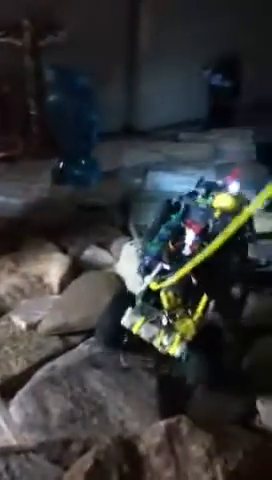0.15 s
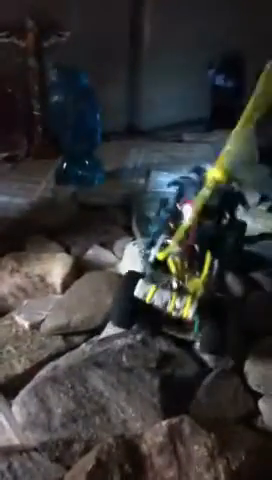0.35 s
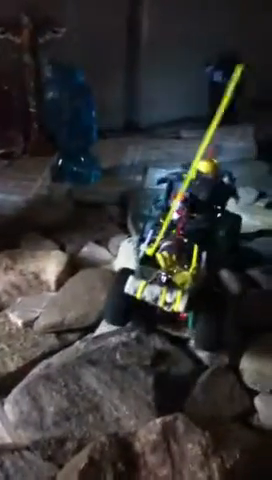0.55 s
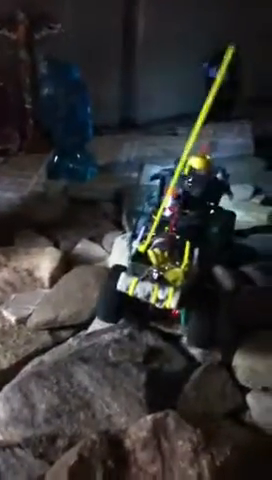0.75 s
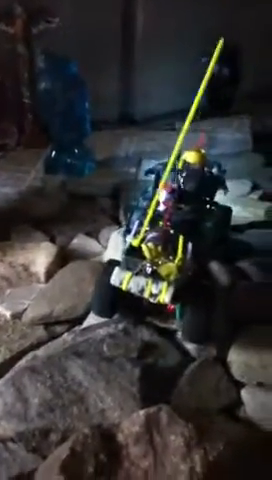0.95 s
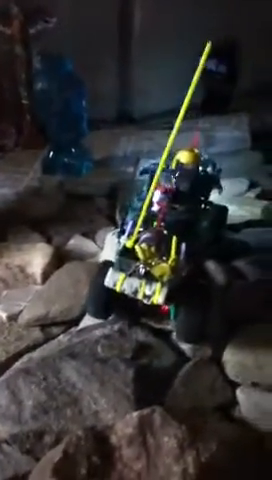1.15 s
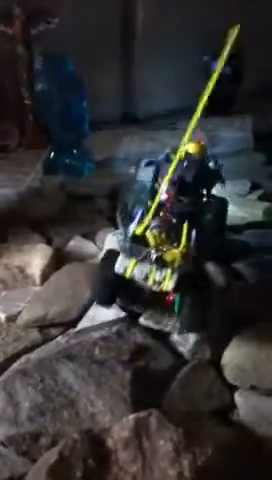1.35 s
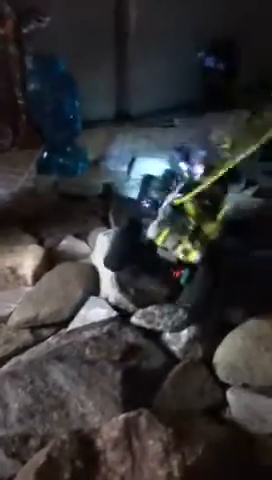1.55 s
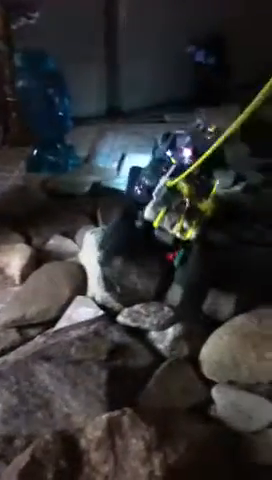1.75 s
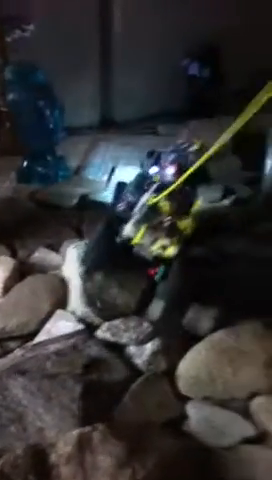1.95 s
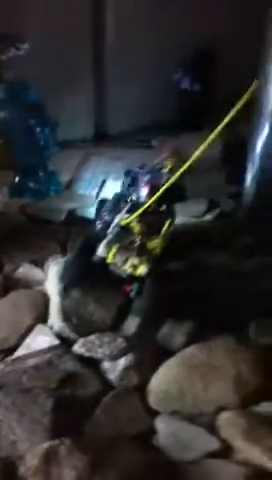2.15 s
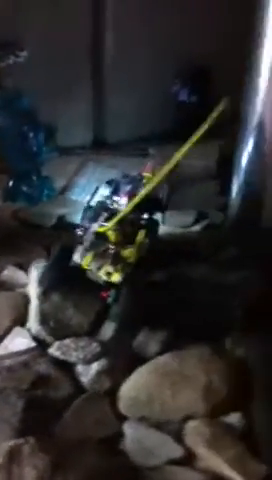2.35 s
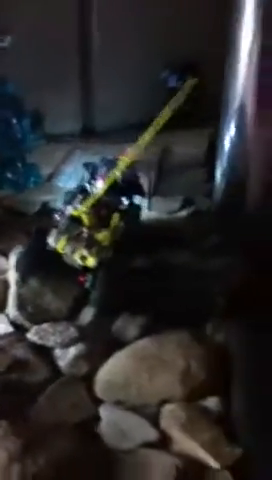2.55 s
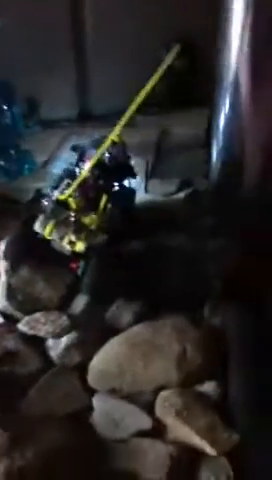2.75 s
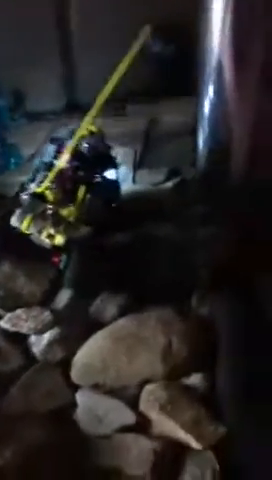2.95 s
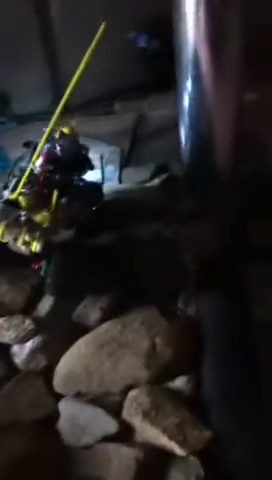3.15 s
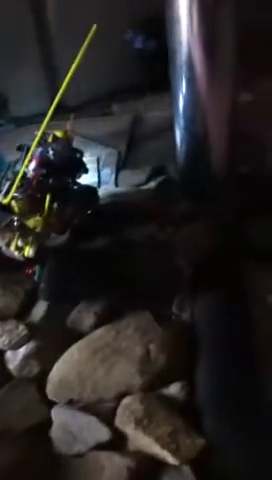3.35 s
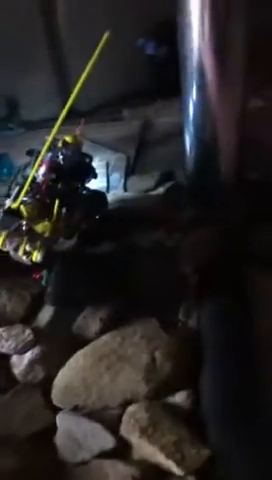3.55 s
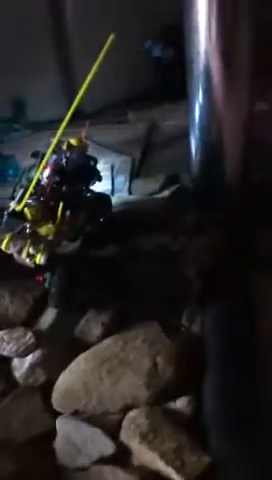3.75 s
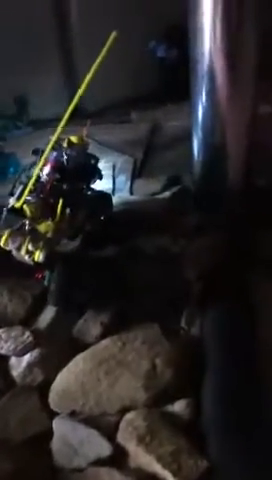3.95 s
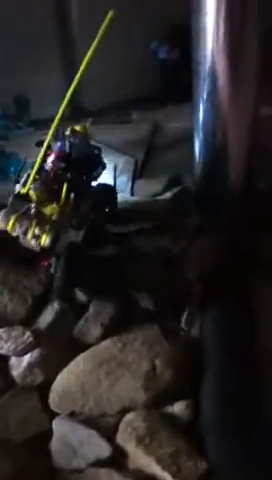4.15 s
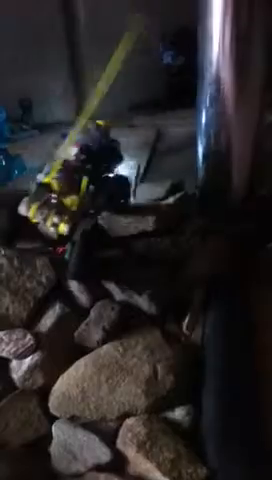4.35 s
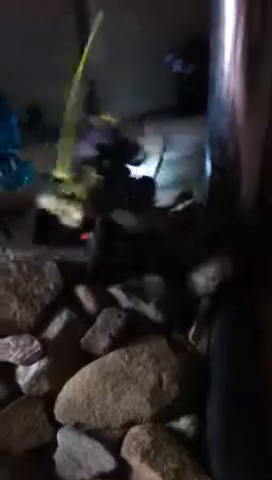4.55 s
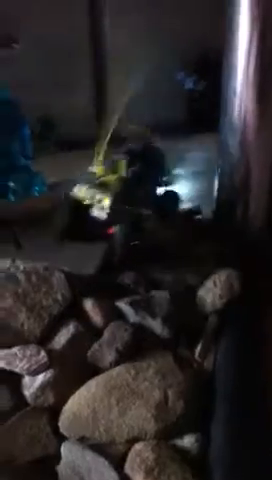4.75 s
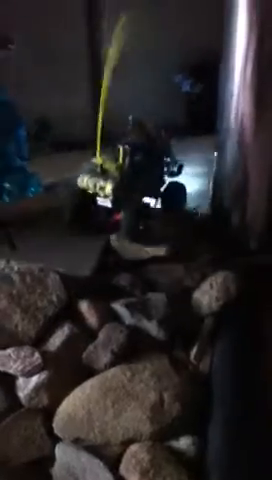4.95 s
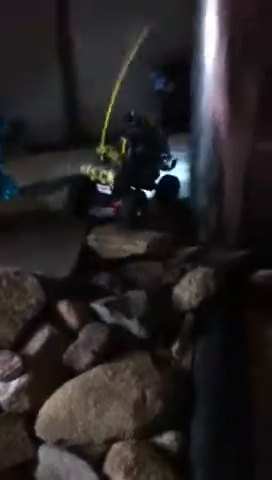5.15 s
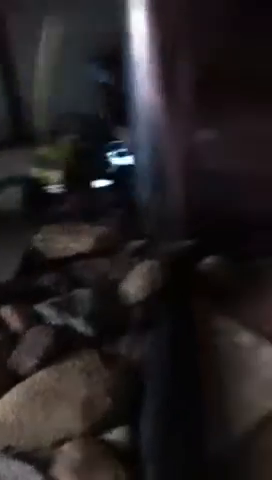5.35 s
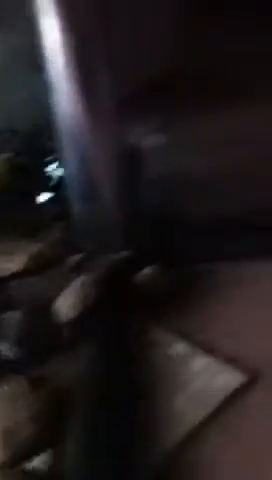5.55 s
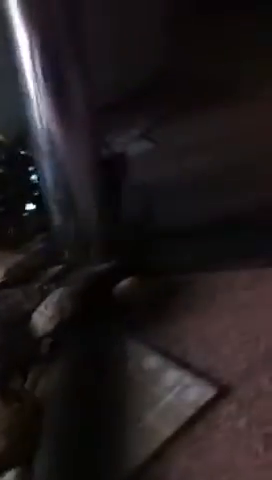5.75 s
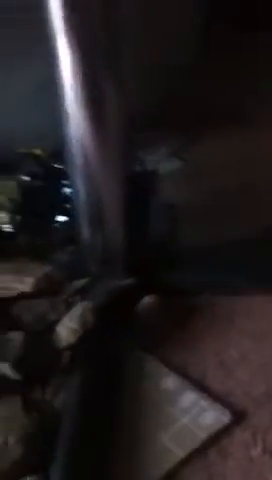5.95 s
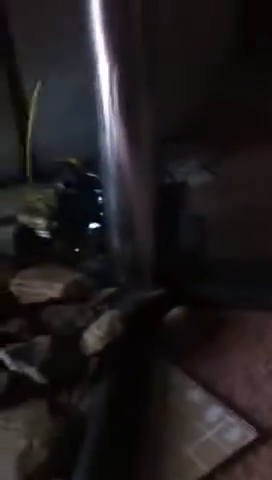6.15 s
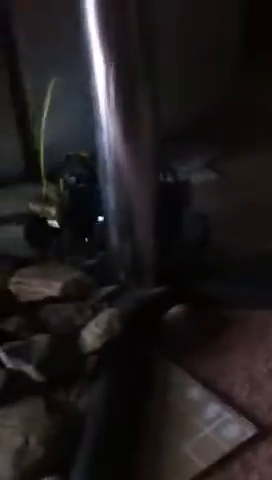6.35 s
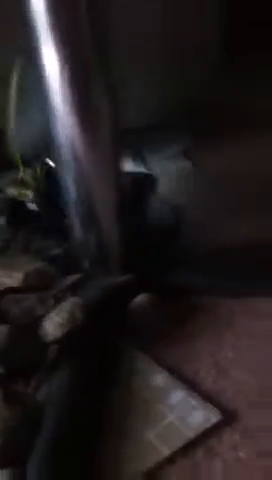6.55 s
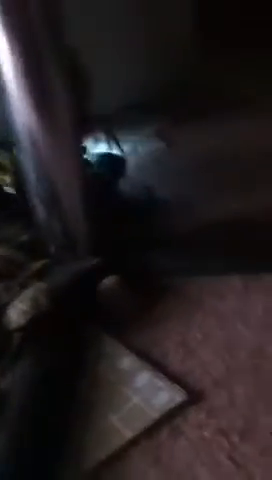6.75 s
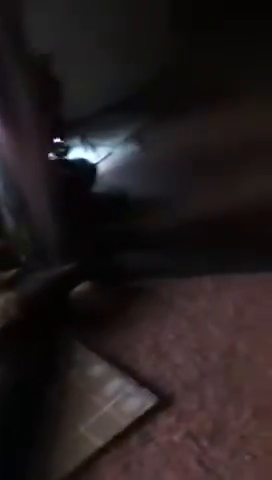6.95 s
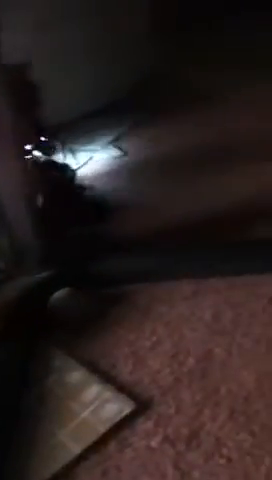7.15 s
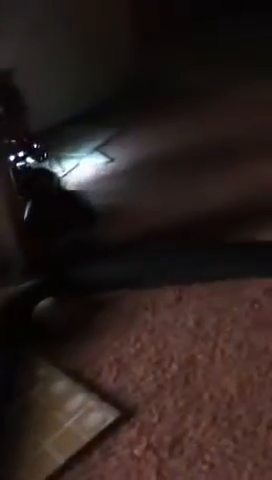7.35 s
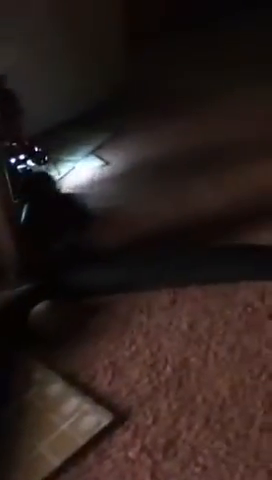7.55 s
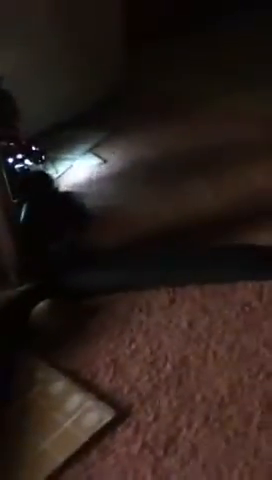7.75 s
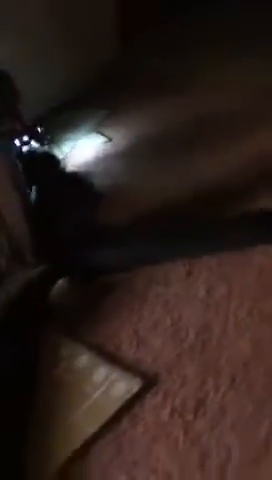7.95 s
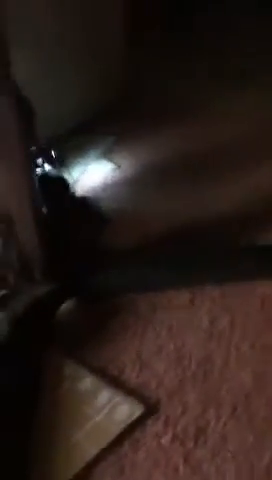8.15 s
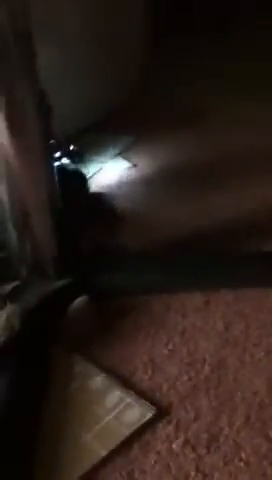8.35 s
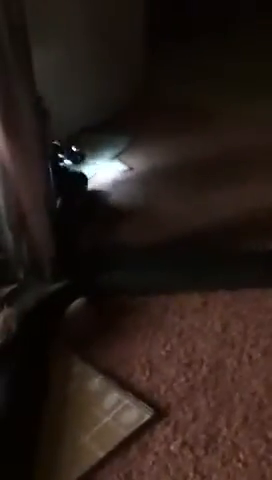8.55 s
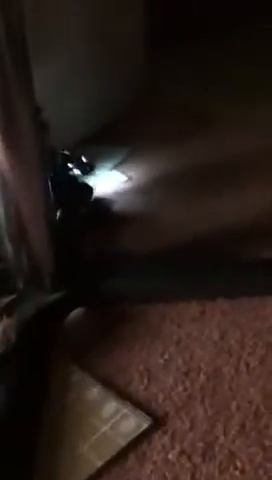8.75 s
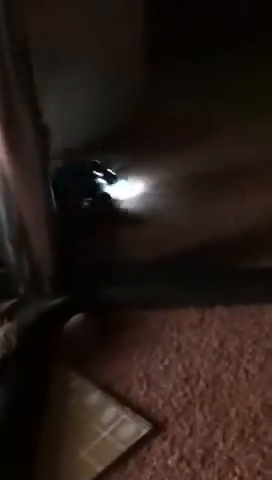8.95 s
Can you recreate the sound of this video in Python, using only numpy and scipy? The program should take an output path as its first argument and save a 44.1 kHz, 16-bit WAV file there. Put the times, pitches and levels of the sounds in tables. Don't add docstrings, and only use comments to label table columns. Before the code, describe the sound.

A quiet, small-sounding room with soft hiss and low rumble, heard by a phone microphone. At 0.1-0.6 s a toy crawler's plastic gearbox rattles close by, raspy and pulsing, with a sharp snap near 0.45. A faint, thin servo whine follows. A second burst runs 1.3-1.95 s, with the loudest stone knock and wheel thump at 1.65. Then near quiet: tiny dry ticks, high servo singing, a dull far bump at 2.56, and a very faint steering whirr around 3.0. From 4.0 the gears build to a long rattle until 5.55, with a hard bright clack at 4.9, singing gear tones and belly scrape from 5.2, fading by 5.8. A softer, farther whirr runs 6.1-7.7 s, with small knocks at 6.4-6.7, slowing unevenly to rest. One sharp fingertip tap on the microphone case at 8.06. A last short, rising whirr lasts 8.5-9.1 s.

```python
import sys
import numpy as np
from scipy import signal
from scipy.fft import rfft, irfft, next_fast_len
from scipy.io import wavfile
from scipy.ndimage import uniform_filter1d, map_coordinates

SR = 44100
rng = np.random.default_rng(int(sys.argv[2]) if len(sys.argv) > 2 else 0)


def field_ratio(decibels):
    return 10 ** (np.asarray(decibels, dtype=float) / 20)


def master(y):
    cut = np.clip(np.atleast_2d(y).T, -1, 1)
    pcm = np.round(cut * 32767)
    wavfile.write(sys.argv[1], SR, pcm.astype(np.int16))


N = 400869
T = np.arange(N) / SR

# (time [s], rattle level [dB], freewheel treble re rattle [dB])
DRIVE_ROCKS = [
    [(0.09, -48, -8), (0.18, -33, -12.5), (0.274, -32.5, -9.5), (0.324, -35.5, -1.5), (0.384, -28.5, -7.5),
     (0.462, -36, -10), (0.505, -70, -15), (0.554, -45, -6), (0.589, -88, -14)],
    [(1.305, -68, 2), (1.392, -37, -12), (1.537, -34.5, -5.5), (1.621, -43.5, 1), (1.69, -35, -1),
     (1.801, -40.5, -5), (1.871, -38, -0.5), (1.911, -53, -7.5), (1.946, -78, 6)],
    [(3.92, -68, -25), (4.041, -64.5, -8), (4.136, -47, -4), (4.265, -44, -7.5), (4.345, -36.5, -6.5),
     (4.425, -35, -4.5), (4.485, -42, -0.5), (4.53, -37.5, -2), (4.734, -43.5, 2.5)],
    [(4.74, -46, 3.5), (4.859, -36, -1.5), (4.904, -33, -10), (4.969, -40, -2), (5.098, -41.5, -1.5),
     (5.173, -46.5, 4), (5.293, -36.5, -3.5), (5.378, -36.5, -6), (5.557, -63.5, -12)],
]
# (time [s], rattle level [dB], freewheel treble re rattle [dB])
DRIVE_FLOOR = [
    [(6.105, -60.5, -10), (6.201, -56.5, -6), (6.256, -47, -5.5), (6.341, -44, -2.5), (6.395, -44, -3),
     (6.485, -42.5, -2), (6.545, -44, -1), (6.735, -43.5, -3), (6.864, -48.5, -7)],
    [(6.87, -47, -8), (7.029, -43.5, -7.5), (7.229, -45, -5.5), (7.323, -55.5, -5), (7.433, -54, -9),
     (7.583, -64.5, -6), (7.658, -58, -5), (7.69, -69, -14)],
    [(8.497, -53, -5), (8.53, -48.5, -8), (8.62, -47, -5), (8.685, -41.5, -3.5), (8.795, -45.5, -6.5),
     (8.94, -42.5, -4), (9.079, -44, 0)],
]
# (time [s], rattle level [dB], freewheel treble re rattle [dB])
STEER_GEARS = [
    (2.96, -71, -1),
    (3.033, -59.5, -1),
    (3.13, -59, -1),
    (3.188, -73, -3),
]
# (time [s], swell level [dB])
BINDS_CLIMB = [(0.103, -1), (0.121, 6), (0.181, 4), (0.229, 5.5), (0.275, 4), (0.382, 9), (0.412, 12),
               (0.451, 9), (0.51, 22), (0.557, 4), (1.333, 9), (1.349, 4), (1.393, -2.5), (1.447, 5),
               (1.505, 6), (1.544, 8), (1.583, 7.5), (1.651, 4.5), (1.694, 4.5), (1.731, 4.6), (1.767, 5.5),
               (1.813, 6), (1.862, 6), (1.894, 9.5), (1.908, 7.5)]
# (time [s], swell level [dB])
BINDS_CROSS = [(4.067, 3), (4.09, 5), (4.108, 7), (4.125, 0), (4.142, 5), (4.218, 5.5), (4.295, 4.5),
               (4.346, 8.5), (4.386, 5), (4.414, 6), (4.447, 5), (4.546, 5), (4.596, 4.5), (4.614, 7.5),
               (4.685, 6.5), (4.775, 6.5), (4.833, 6.5), (4.906, 10.5), (4.932, 3), (4.991, 3.5),
               (5.024, 4.5), (5.066, 4), (5.145, 2.5), (5.19, 5.4), (5.232, 4.5), (5.3, 6), (5.336, 4),
               (5.366, 3.5), (5.398, 5.5), (5.443, 9), (5.486, 4), (5.517, 0)]
# (time [s], swell level [dB])
BINDS_FLOOR = [(6.258, 5.5), (6.308, 6.5), (6.349, 6), (6.385, 8.5), (6.422, 6), (6.461, 7), (6.502, 5.5),
               (6.522, 2), (6.582, 6), (6.635, 5.5), (6.693, 2.5), (6.731, 6), (6.765, 8), (6.806, 8),
               (6.855, 3.5), (6.907, 6.5), (6.948, 6.5), (6.99, 6.5), (7.029, 7.5), (7.066, 6), (7.119, 6),
               (7.152, 5), (7.196, 7.5), (7.236, 8), (7.284, 7), (7.35, 5.5), (7.423, 6), (7.514, 6),
               (7.557, 5), (7.577, 1), (7.613, -1), (7.664, 1), (8.516, 2), (8.573, 5.5), (8.609, 4.5),
               (8.653, 4.5), (8.686, 3), (8.714, 5.5), (8.749, 6.5), (8.785, 6), (8.824, 7.5), (8.859, 8),
               (8.893, 6.5), (8.926, 6), (8.956, 4), (9.046, 2), (9.069, 1.5)]
# (time [s], swell level [dB])
BINDS_MORE = [(0.136, 7), (0.193, 6), (0.362, 3.5), (0.435, 1), (1.616, 6), (4.52, 6), (4.849, 3),
              (4.889, 2.5)]
# (frequency [Hz], level per Hz [dB])
SHELL_COLOUR = [(500, -33), (1100, -26.5), (1650, -13), (2200, -10), (3700, -5), (5000, -9), (7670, -9.5),
                (9450, -14), (12300, -15), (15700, -33)]
# (from time [s], three resonances [Hz], lift [dB])
FACING_PANELS = [(0.0, 3530, 4200, 5860, 11.5), (0.16, 3630, 4370, 7700, 12), (0.21, 3550, 4300, 7580, 9.6),
                 (0.26, 3340, 4400, 7600, 9.6), (0.3, 3010, 3620, 4480, 8.9),
                 (0.345, 3600, 3960, 7760, 4.8), (0.401, 3650, 4400, 6030, 11),
                 (0.43, 3720, 4350, 6070, 11), (1.3, 4080, 5770, 7600, 13.5), (1.42, 4050, 5810, 7350, 11),
                 (1.48, 2380, 3960, 4280, 7.8), (1.56, 3270, 3800, 6500, 6.1),
                 (1.62, 3830, 6100, 6540, 2.5), (1.71, 3180, 4330, 6500, 8.1),
                 (1.79, 2400, 3930, 6100, 3.3), (2.95, 3360, 3940, 4310, 5.6),
                 (4.05, 3320, 4100, 5530, 14.7), (4.27, 3680, 4100, 5490, 8.3), (4.37, 3240, 3700, 5440, 5),
                 (4.47, 3490, 4800, 7520, 7.0), (4.57, 3630, 4350, 5510, 6.4),
                 (4.66, 2880, 5380, 7600, 5.6), (4.8, 2820, 3380, 3750, 4.1), (4.95, 2970, 3490, 7240, 5.3),
                 (5.1, 3650, 4240, 7500, 4.2), (5.26, 3010, 3800, 4230, 6.4), (5.33, 3010, 3600, 4400, 6.8),
                 (6.15, 3170, 3870, 4650, 6), (6.3, 3100, 4520, 7900, 5.1), (6.44, 3180, 4670, 8070, 6.3),
                 (6.56, 3400, 3850, 4300, 3.2), (6.66, 2850, 3300, 4440, 8.8), (6.8, 3200, 3900, 4910, 6.7),
                 (6.97, 2720, 3550, 4050, 6.8), (7.15, 2760, 3830, 6800, 7.7),
                 (7.31, 2770, 3800, 4200, 6.6), (8.48, 2820, 3870, 4370, 7.5),
                 (8.63, 2740, 4370, 7600, 8.1), (8.8, 2780, 3150, 4700, 6.5), (8.91, 2430, 2990, 3930, 4.7)]
# (start [s], end [s], start pitch [Hz], end pitch [Hz], level [dB])
MESH_TONES = [(1.402, 1.53, 1080, 1320, -64), (1.725, 1.763, 1487, 1160, -57),
              (1.76, 1.81, 1130, 1410, -57), (4.12, 4.24, 2150, 2300, -51), (4.317, 4.45, 1153, 1510, -61),
              (4.68, 4.867, 740, 1010, -63), (4.967, 5.071, 1740, 1865, -53),
              (5.157, 5.305, 2000, 2204, -46.5), (5.307, 5.358, 1830, 1770, -49),
              (5.331, 5.419, 3070, 2950, -46), (6.336, 6.422, 3140, 3090, -50),
              (6.445, 6.533, 3150, 3100, -44.5), (6.471, 6.525, 3460, 3350, -41.5),
              (6.44, 6.48, 1560, 1600, -54), (6.727, 6.825, 1645, 1397, -51.5),
              (6.248, 6.359, 2050, 2290, -56), (8.815, 8.874, 1480, 1530, -57),
              (6.59, 6.64, 2150, 2090, -43), (6.68, 6.8, 3240, 3160, -47), (6.36, 6.532, 2150, 2240, -68),
              (6.808, 6.98, 2205, 2255, -51), (6.892, 6.97, 1270, 1220, -57),
              (6.98, 7.068, 1340, 1307, -52.5), (7.072, 7.18, 1220, 1284, -57),
              (7.183, 7.254, 1420, 1300, -53), (8.521, 8.608, 2760, 2830, -51),
              (8.533, 8.608, 1853, 2470, -57), (8.505, 8.527, 1540, 1590, -58),
              (8.639, 8.783, 1487, 1783, -55.5), (8.7, 8.773, 2210, 2700, -65),
              (8.996, 9.09, 1610, 1940, -60), (5.411, 5.75, 718, 694, -64), (5.412, 5.605, 1450, 1380, -67),
              (8.889, 8.966, 1700, 2050, -51), (8.972, 9.092, 2300, 2700, -50),
              (8.894, 8.97, 3880, 3950, -54), (8.97, 9.047, 3020, 3110, -48)]
# (time [s], peak level [dB], skid plate re frame [dB], bright plastic re frame [dB])
KNOCKS = [(0.384, -55, -9, -7), (0.405, -34.5, -0.5, -24), (0.424, -34, -20, -26), (1.444, -48, -2, 3),
          (1.648, -18, 0, -1), (1.661, -53, -17, -8), (1.919, -47, -1, -16), (2.236, -60, -6, 12),
          (2.244, -60, -6, 9), (2.252, -54, -2, 5), (4.476, -33, -14, -2), (4.875, -31, 2.5, -6),
          (4.881, -36.5, 0, -12), (4.902, -19.5, 0, 7.5), (4.909, -25, -4, 0), (4.924, -33, -6, 0),
          (4.949, -45, -12, -12), (5.145, -31, -28, 0.5), (5.241, -48, -14, 11), (5.351, -44, -6, 5),
          (5.441, -44.5, -7, -4), (5.517, -48, -18, 4), (5.587, -49.5, -18, 1.5), (6.383, -36.5, -12, -12),
          (6.396, -28, -16, 4.5), (6.534, -32.5, -13, 1.5), (6.651, -39.5, 1, 3), (6.662, -36, 1, 3),
          (6.79, -47.5, -10, 9), (7.862, -54, -5, 0)]
# (frequency [Hz], level [dB], t60 [s])
CHASSIS_MODES = [(552, -2, 0.04), (626, -1.5, 0.022), (783, -8, 0.034), (980, 0, 0.0088),
                 (1460, 9.5, 0.0095), (1700, 7, 0.0071), (2050, 1, 0.017), (2700, 7.5, 0.0094),
                 (3500, -9, 0.011), (4400, 1, 0.0047)]
# (time [s], level [dB])
SCRAPE = [
    (5.2, -67),
    (5.246, -53.5),
    (5.8, -66.5),
]
# (frequency [Hz], level [dB], t60 [s])
TYRE_MODES = [(289, 0, 0.033)]
# (time [s], level [dB])
LANDINGS = [
    (1.6486, -26),
    (1.662, -40),
    (6.651, -38),
]
# (frequency [Hz], level [dB], t60 [s])
WHEEL_MODES = [(312, -14, 0.026), (406, -0.5, 0.021)]
# (time [s], peak level [dB], pitch [Hz])
TICKS = [(0.0642, -38.5, 3060), (0.103, -46, 3580), (0.1785, -40, 3500), (0.4482, -17.5, 10000),
         (0.4605, -24, 6030), (0.461, -37, 12500), (0.552, -51, 4030), (0.4922, -39, 3640),
         (0.506, -35, 4020), (0.6433, -46, 5450), (1.306, -39, 2700), (1.331, -34.5, 4190),
         (1.389, -29, 3960), (2.395, -50, 3400), (2.412, -47, 3540), (2.484, -49, 3580), (2.628, -46, 4700),
         (3.564, -45, 2360), (3.584, -43, 2780), (3.6188, -37.5, 3470), (3.766, -39.5, 2880),
         (4.0083, -41.5, 2760), (4.0633, -44, 2350), (8.426, -46, 2820)]
# (from time [s], pulse share of period [0-1], whine level [dB],
# case resonance facing the microphone [Hz])
SERVO_HOLDS = [(0, 0.39, -62, 3300), (0.045, 0.2, -90, 3000), (0.6, 0.305, -76, 3800),
               (0.7, 0.39, -74, 3900), (0.81, 0.215, -73, 3200), (0.855, 0.222, -64, 3250),
               (1.03, 0.36, -66, 3400), (1.1, 0.375, -66, 3300), (1.185, 0.335, -68, 3800),
               (1.25, 0.36, -69, 3200), (1.3, 0.2, -90, 3000), (2.33, 0.41, -76, 2500),
               (2.365, 0.2, -90, 3000), (2.38, 0.13, -70, 2500), (2.428, 0.2, -90, 3000),
               (2.45, 0.41, -74, 2200), (2.505, 0.2, -90, 3000), (2.555, 0.39, -73, 2700),
               (2.6, 0.135, -71, 2400), (2.69, 0.09, -70.5, 2500), (2.81, 0.08, -72, 2850),
               (2.95, 0.08, -72, 2800), (3.13, 0.09, -71.5, 2650), (3.28, 0.44, -71, 3000),
               (3.48, 0.43, -71, 3200), (3.535, 0.48, -71, 2900), (3.59, 0.2, -82, 3000),
               (3.68, 0.36, -73, 3200), (3.735, 0.43, -68, 2900), (3.82, 0.2, -80, 2800),
               (3.85, 0.29, -73, 2700), (3.9, 0.3, -77, 2300), (3.935, 0.41, -68.5, 2700),
               (4.02, 0.31, -73, 3600), (4.06, 0.2, -90, 3000), (5.53, 0.435, -63.5, 3600),
               (5.6, 0.44, -71, 3300), (5.7, 0.425, -74, 3200), (5.9, 0.435, -74, 2800),
               (6.08, 0.2, -90, 3000), (7.9, 0.37, -79, 3400), (8.03, 0.2, -90, 3000),
               (8.2, 0.415, -78, 2500), (8.49, 0.2, -90, 3000)]
# (time [s], level [dB])
SERVO_WHISTLE = [(.55, -88), (.7, -76), (1.25, -70), (1.33, -95), (2.55, -95), (2.7, -69), (3.5, -71),
                 (3.7, -80)]
# (frequency [Hz], level [dB], t60 [s])
CASE_MODES = [(124, -6, 0.078), (206, 7, 0.044), (346, -8, 0.084), (590, -0.5, 0.049), (1090, -10, 0.032),
              (1830, -7, 0.051), (2020, 4.5, 0.02), (3920, -4.5, 0.013)]
# (frequency [Hz], level per Hz [dB])
AIR_COLOUR = [(15, -59), (25, -26), (76, -4), (220, -5), (400, -10), (1820, -12.5), (3990, -13),
              (10800, -15.5), (15800, -20.5)]


def unit(x):
    return x / np.sqrt(np.mean(x ** 2) + 1e-20)


def along(points, hz):
    f, v = np.transpose(points)
    return np.interp(np.log(hz + 1), np.log(f + 1), v)


def curves(rows, t=T, edge=None):
    s, *cols = np.transpose(rows)
    return [np.interp(t, s, c, edge, edge) for c in cols]


def wobble(rate):
    knots = rng.standard_normal(int(N * rate / SR) + 4)
    return map_coordinates(knots, [T * rate])


def coloured(x, gain):
    m = next_fast_len(len(x) + 8192)
    return irfft(rfft(x, m) * gain(np.fft.rfftfreq(m, 1 / SR)), m)[:len(x)]


def ring(modes, t):
    return sum(field_ratio(db - 60 * t / t60) * np.sin(2 * np.pi * hz * t) for hz, db, t60 in modes)


def tight_spots(dip=0.51, tight_share=0.17, longest_turn_s=0.043):
    swell = np.zeros(N)
    at, size_db = np.transpose(sorted(BINDS_CLIMB + BINDS_CROSS + BINDS_FLOOR + BINDS_MORE))
    turns_s = np.minimum(np.gradient(at), longest_turn_s)
    for centre, height_db, turn_s in zip(at, size_db, turns_s):
        near = slice(max(round((centre - 0.1) * SR), 0), round((centre + 0.1) * SR))
        swell[near] += height_db * np.exp(-0.5 * ((T[near] - centre) / (tight_share * turn_s)) ** 2)
    return swell - dip * 2 * uniform_filter1d(swell, size=SR // 10)


def shell_colour(hz, t, shape, patchy_db=3.0, width_hz=190):
    def bump(centre_hz):
        return 1 / (1 + ((hz - centre_hz) / width_hz) ** 2)

    flex = uniform_filter1d(rng.standard_normal(shape), size=2, axis=0)
    flex = uniform_filter1d(flex, size=22, axis=1)
    facing_db = (t < 8.4) * (2.5 * bump(2110) - 3 * bump(2720))
    colour = field_ratio(along(SHELL_COLOUR, hz) + patchy_db * unit(flex) + facing_db)
    bend = 1 + 0.012 * np.array([np.interp(t, T, wobble(14)) for _ in range(3)])
    ends = [row[0] for row in FACING_PANELS[1:]] + [N / SR + 1]
    for (start, *panels, db), end in zip(FACING_PANELS, ends):
        on = (t >= start) & (t < end)
        colour[:, on] *= field_ratio(db * sum(map(bump, np.array(panels)[:, None] * bend[:, on])))
    return colour


def drive_gain(hz, t, colour):
    gain = np.zeros(colour.shape)
    for run in DRIVE_ROCKS + DRIVE_FLOOR + [STEER_GEARS]:
        on = (t >= run[0][0]) & (t < run[-1][0] + 0.012)
        rattle_db, free_db = curves(run, t[on])
        slow_db = np.maximum(-42 - rattle_db, 0)
        low_db = rattle_db - 6.5 + 0.41 * free_db + 0.5 * slow_db
        if run is STEER_GEARS:
            low_db = low_db - 20
        gain[:, on] = 0
        bands = (0, 2700, low_db), (2700, 5200, rattle_db), (5200, SR, rattle_db + free_db)
        for low_hz, high_hz, level_db in bands:
            part = colour[:, on] * ((hz >= low_hz) & (hz < high_hz))
            usual = np.sqrt(uniform_filter1d(np.mean(part ** 2, axis=0), size=20))
            gain[:, on] += part * field_ratio(level_db) / usual
        gain[:, on] *= field_ratio(-0.16 * slow_db * (hz > 8800))
    return gain


def gearbox(swell_db):
    blows_per_s, spread_db, brush = 7000, 2.5, 1.3
    struck = rng.random(N) < blows_per_s / SR
    force = field_ratio(spread_db * np.clip(rng.standard_normal(N), -2, 2))
    blows = struck * force * rng.choice([-1, 1], N)
    rough = unit(blows) + brush * rng.standard_normal(N)
    hz, t, z = signal.stft(rough, SR, nperseg=512, noverlap=384)
    hz = hz[:, None]
    gain = drive_gain(hz, t, shell_colour(hz, t, z.shape))
    rattle = signal.istft(z * gain, SR, nperseg=512, noverlap=384)[1][:N]
    return field_ratio(swell_db) * rattle / np.sqrt(1 + brush ** 2)


def mesh(swell_db, waver_hz=28, edge_s=0.018, rough=0.55):
    out = np.zeros(N)
    waver = waver_hz * (wobble(110) + 0.5 * wobble(30))
    flutter_db = 3 * wobble(60)
    for start, end, start_hz, end_hz, db in MESH_TONES:
        near = slice(round((start - edge_s) * SR), round((end + edge_s) * SR))
        t = T[near]
        fade = np.clip(np.minimum(t - start, end - t) / edge_s + 0.5, 0, 1)
        hz = np.interp(t, [start, end], [start_hz, end_hz]) + waver[near]
        out[near] += fade * field_ratio(db) * np.sin(2 * np.pi * np.cumsum(hz) / SR)
    return out * field_ratio(0.38 * swell_db + flutter_db) * (0.8 + rough * wobble(260))


def knocks(contact_s=0.007):
    out, t = np.zeros(N + SR), np.arange(SR // 8) / SR
    for s, db, plate_db, bright_db in KNOCKS:
        contact = rng.standard_normal(len(t)) * np.exp(-(t / contact_s) ** 4)
        contact *= np.minimum(t / 0.0015, 1) ** 2
        frame = CHASSIS_MODES[:3], db
        plate = CHASSIS_MODES[3:4], db + plate_db
        plastic = CHASSIS_MODES[4:], db + bright_db
        for modes, level_db in (frame, plate, plastic):
            hit = np.zeros(len(t))
            for mode in modes:
                partial = signal.fftconvolve(contact, ring([mode], t))[:len(t)]
                hit += field_ratio(mode[1]) * partial / np.abs(partial).max()
            hit /= np.linalg.norm(field_ratio([mode[1] for mode in modes]))
            out[round(s * SR):][:len(t)] += field_ratio(level_db) * hit
    return out[:N]


def scrape():
    t = np.arange(SR // 8) / SR
    grit = rng.standard_normal(N) * field_ratio(1.3 * wobble(45))
    drag = unit(signal.fftconvolve(grit, ring(CHASSIS_MODES[1:3], t))[:N])
    return field_ratio(curves(SCRAPE, edge=-120)[0]) * drag


def chassis():
    return coloured(knocks() + scrape(), lambda hz: 1 / (1 + (510 / (hz + 1)) ** 10))


def wheels():
    out, t = np.zeros(N + SR), np.arange(SR // 8) / SR
    for s, db, *_ in KNOCKS:
        out[round(s * SR):][:len(t)] += field_ratio(db - 14) * ring(TYRE_MODES, t) * np.minimum(t / 0.005, 1)
    for s, db in LANDINGS:
        out[round(s * SR):][:len(t)] += field_ratio(db) * ring(WHEEL_MODES, t) * np.minimum(t / 0.0029, 1)
    return out[:N]


def ticks():
    out, t = np.zeros(N + SR), np.arange(SR // 30) / SR
    for s, db, hz in TICKS:
        def snap_colour(f):
            broad = 1.05 / (1 + (f / max(7500, 2.0 * hz)) ** 4)
            return (f > 1400) * (broad + np.exp(-0.5 * ((f - hz) / 500) ** 2))

        decay = field_ratio(-60 * t / 0.051 * max(hz / 4000, 1))
        snap = rng.standard_normal(len(t)) * decay * np.minimum(t / 0.00096, 1)
        snap = coloured(snap, snap_colour)
        out[round(s * SR):][:len(t)] += field_ratio(db) * snap / np.abs(snap).max()
    return out[:N]


def servo(switch_hz=476.8, case_width_hz=580, flutter_db=1.8, leak=0.1, buzz=0.4):
    start, share, db, case_hz = np.transpose(SERVO_HOLDS)
    row = np.clip(np.searchsorted(start, T) - 1, 0, None)
    whistle = field_ratio(curves(SERVO_WHISTLE)[0])
    jitter_s = 0.000005 * wobble(150)
    settle = 1 - np.exp(-((T - start[row]) / 0.012) ** 2)
    out = np.zeros(N)
    for k in [*range(3, 15), *range(22, 29)]:
        hz = k * switch_hz
        comb = np.abs(np.sin(np.pi * k * share)) + leak
        body = field_ratio(db + 3.7) * comb / np.sqrt(1 + ((hz - case_hz) / case_width_hz) ** 4)
        top = whistle * comb[row] * np.exp(-0.5 * ((hz - 12200) / 900) ** 2)
        level = uniform_filter1d(body[row] * settle, size=700) + top
        cycles = hz * (T + jitter_s * hz / 3000) + rng.random()
        out += level * field_ratio(flutter_db * wobble(40)) * np.sin(2 * np.pi * cycles)
    return out * (1 + buzz * wobble(500))


def tap(tap_s=8.0572, tap_db=-15):
    t = np.maximum(T - tap_s, 0)
    push = np.exp(-0.5 * ((T - tap_s - 0.00025) / 0.00009) ** 2)
    touch = field_ratio(tap_db) * (push - 0.14 * ring(CASE_MODES, t))
    return coloured(touch, lambda hz: 1 / (1 + (80 / (hz + 1)) ** 4))


def room(x, t60_s=0.18):
    t = np.arange(SR // 3) / SR
    tail = rng.standard_normal(len(t)) * field_ratio(-60 * t / t60_s) * (t > 0.004)
    return signal.fftconvolve(x, tail / np.linalg.norm(tail))[:N]


def background(rumble_db=-62, hiss_db=-59):
    air = coloured(rng.standard_normal(N), lambda hz: field_ratio(along(AIR_COLOUR, hz)))
    low = coloured(air, lambda hz: 1 / (1 + (hz / 400) ** 4))
    hiss = (air - low) / np.std(air)
    thud_s, thud_lasts_s, thud_db = 2.56, 0.09, 6
    thud = (T > thud_s) & (T < thud_s + thud_lasts_s)
    lift_db = uniform_filter1d(thud_db * thud, size=800)
    return field_ratio(rumble_db + lift_db + wobble(10.0)) * unit(low) + field_ratio(hiss_db) * hiss


def scene():
    swell_db = tight_spots()
    toy = gearbox(swell_db) + mesh(swell_db) + chassis() + wheels() + ticks()
    return (toy + field_ratio(-12) * room(toy) + servo() + tap() + background())[None]


def roll_off(x):
    return signal.sosfilt(signal.butter(12, 16060, fs=SR, output="sos"), x)


def record(dry):
    clip = 0.25
    squeezed = dry[0] / (1 + (dry[0] / clip) ** 4) ** (1 / 4)
    mix = coloured(squeezed, lambda hz: hz < 15800)[None]
    return roll_off(mix)


dry = scene()
out = record(dry)
master(out)
```